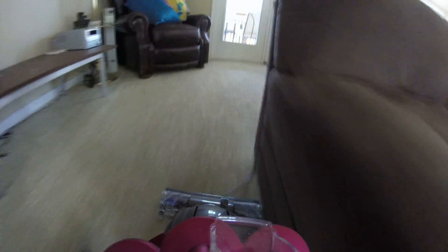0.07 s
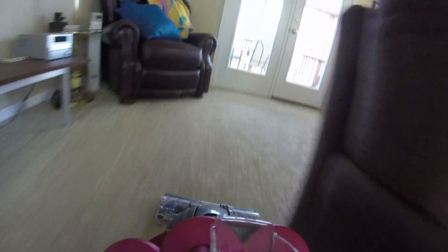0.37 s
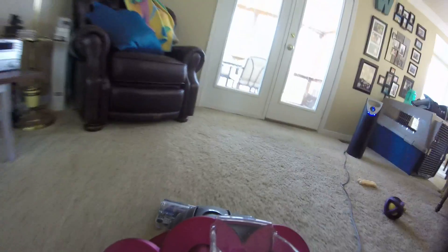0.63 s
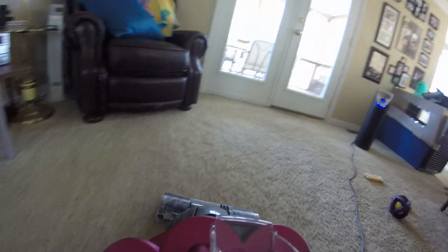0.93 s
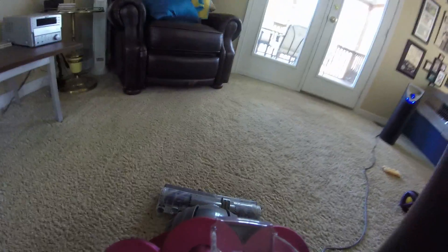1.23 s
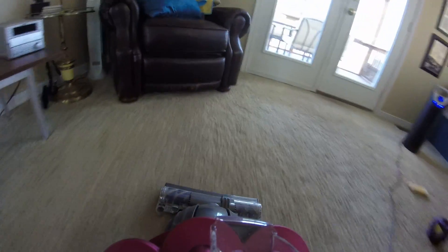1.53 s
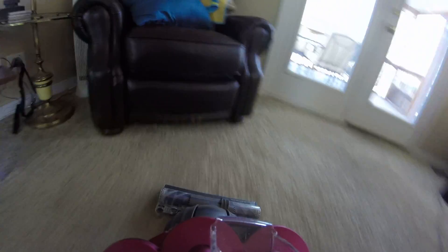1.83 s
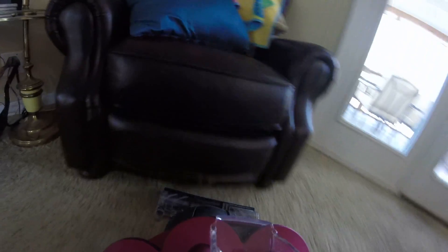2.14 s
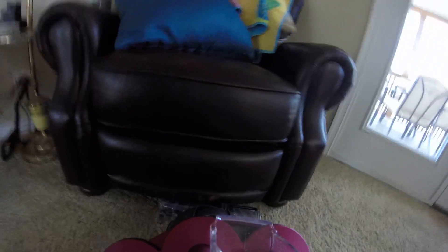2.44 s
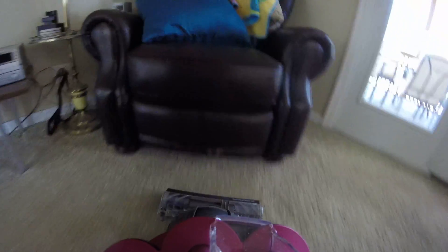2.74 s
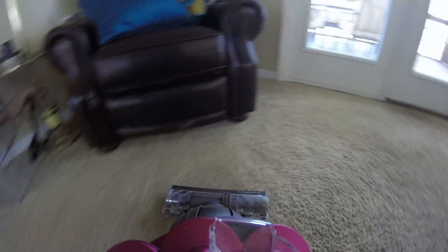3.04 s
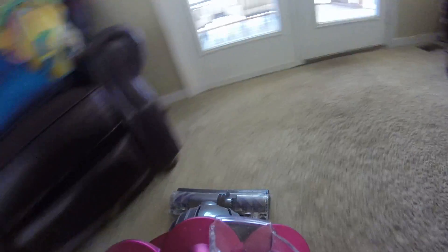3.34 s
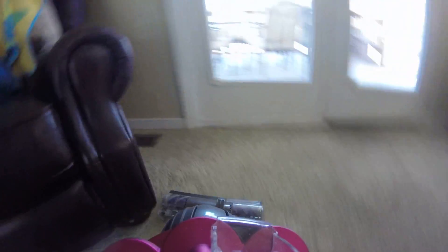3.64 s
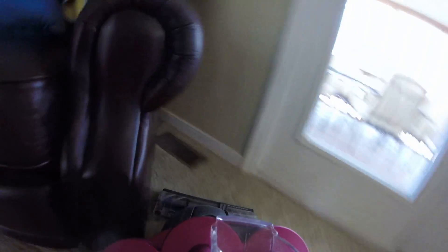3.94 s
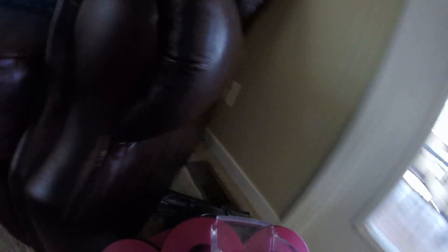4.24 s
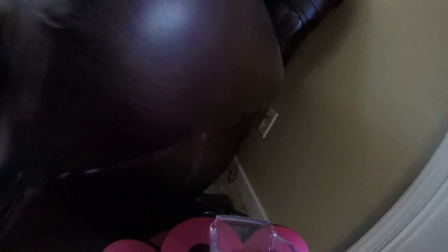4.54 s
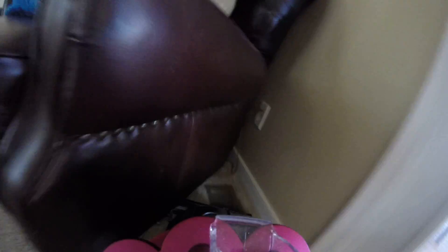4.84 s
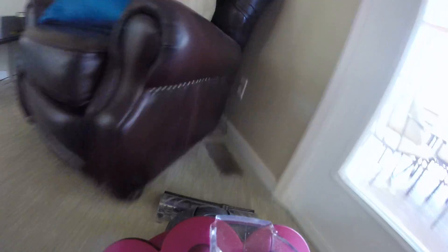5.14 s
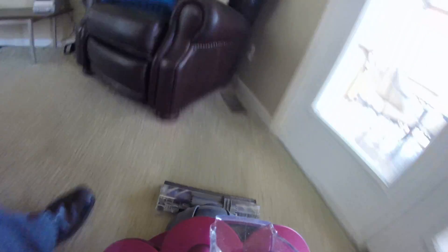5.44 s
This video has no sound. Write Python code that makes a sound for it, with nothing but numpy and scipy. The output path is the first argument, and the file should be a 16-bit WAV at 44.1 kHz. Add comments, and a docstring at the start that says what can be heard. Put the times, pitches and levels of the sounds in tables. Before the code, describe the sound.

An upright vacuum cleaner runs throughout in a living room, heard close up from its handle. The motor hums low under hissing air and a high, wavering whistle, while the wheels rumble over carpet and the plastic housing chatters. A hard bump near the start briefly dips the whole sound. Grit then ticks up the tube now and then, and the head knocks against furniture a few more times in the second half.

```python
"""A living room: an upright vacuum cleaner is pushed over carpet, heard from its own handle.
Wheels rumble and the plastic housing chatters, while the motor hums at twice the mains rate.
Air hisses at the nozzle, whistles in a narrow duct resonance and rushes out of the exhaust.
Grit ticks up the tube and the head bumps against furniture. The first, hardest bump makes
an automatic gain control duck everything for about a second."""
import sys
import numpy as np
from scipy import signal
from scipy.fft import rfft, irfft
from scipy.io import wavfile
from scipy.ndimage import uniform_filter1d

SR = 44100
rng = np.random.default_rng(int(sys.argv[2]) if len(sys.argv) > 2 else 0)


def pcm_store(signal):
    """Save signal as 16-bit PCM."""
    levels = np.round(np.clip(np.atleast_2d(signal), -1, 1) * 32767)
    wavfile.write(sys.argv[1], SR, levels.astype(np.int16).T)


N = 251370
TIME = np.arange(N) / SR


def undb(db):
    """Decibels to gain."""
    return 10 ** (np.asarray(db) / 20)


def unit(x):
    """Scale to rms 1."""
    return x / np.sqrt(np.mean(x ** 2))


def faders(table):
    """One gain curve for each dB column of a timed table."""
    times, *columns = np.transpose(table)
    return [undb(np.interp(TIME, times, db)) for db in columns]


def swells_db(events, width_s):
    """A bell-shaped rise in dB around each (seconds, dB) event."""
    return sum(db * np.exp(-.5 * ((TIME - s) / width_s) ** 2) for s, db in events)


def drift(rate_hz):
    """Smooth random wander with a spread near 1."""
    size = max(int(SR / rate_hz), 2)
    steps = rng.standard_normal(4000).take(np.arange(N) // size, mode="wrap")
    return 1.3 * uniform_filter1d(uniform_filter1d(steps, size), size)


def colour(x, spectrum):
    """Minimum-phase EQ through (Hz, dB) points, falling steeply outside them."""
    hz, db = np.transpose(spectrum)
    octave = np.log2(np.maximum(np.fft.rfftfreq(16384, 1 / SR), 1))
    points = np.log2(hz)
    outside = np.abs(octave - np.clip(octave, points[0], points[-1]))
    curve_db = np.interp(octave, points, db) - np.minimum(120 * outside, 70)
    cepstrum = irfft(np.log(undb(curve_db)))
    half = len(cepstrum) // 2
    cepstrum[1:half] *= 2
    cepstrum[half + 1:] = 0
    response = irfft(np.exp(rfft(cepstrum)))[:half]
    return signal.fftconvolve(x, response)[:N]


def rush(spectrum, flicker_db):
    """Turbulent noise of a given colour whose strength flutters."""
    return unit(colour(rng.standard_normal(N), spectrum)) * undb(flicker_db * drift(28))


def steady(x, share, span_s):
    """Even out a share of the slow swells of a noise; rms 1."""
    size = int(span_s * SR)
    power = uniform_filter1d(uniform_filter1d(x ** 2, size), size)
    return unit(x / power ** (share / 2))


def ring(force, modes):
    """Drive decaying modes of alternating polarity with a force."""
    t = TIME[:SR // 3]
    response = sum((-1) ** k * undb(db - 60 * t / t60) * np.sin(2 * np.pi * hz * t)
                   for k, (hz, t60, db) in enumerate(modes))
    return signal.fftconvolve(force, response / np.abs(response).max())[:N]


def scrapes(times, levels_db, decay_s):
    """A burst of uneven micro-impacts at each time, its energy set by the level."""
    force, t = np.zeros(N + SR), TIME[:SR // 20]
    for s, db, grain in zip(times, levels_db, rng.standard_normal((len(times), len(t)))):
        burst = grain ** 3 * (1 - np.exp(-t / 0.0012)) * np.exp(-t / decay_s)
        start = int(s * SR)
        force[start:start + len(t)] += undb(db) * burst / np.linalg.norm(burst)
    return force[:N]


def blows(times, levels_db):
    """One hard impulse at each time."""
    force = np.zeros(N)
    force[(times * SR).astype(int)] = undb(levels_db)
    return force


# The ride over the carpet. Each row: time in seconds, then rumble, chatter and brush load faders in dB.
CARPET_RIDE = [(0, -33, -23, -36.0), (0.24, -34.5, -25, -35), (0.36, -28, -26, -35),
               (0.86, -40.5, -30, -34.5), (1.1, -38, -28.5, -38.0), (1.5, -34, -29, -40),
               (1.72, -29.5, -28, -32.5), (2.34, -37.5, -28.5, -39.0), (2.52, -31, -26.5, -36),
               (2.94, -36.5, -30.5, -37.0), (3.3, -38, -27.5, -39), (3.66, -29, -29, -39),
               (4.08, -37.5, -30, -44), (4.56, -31, -28.5, -42.5), (4.78, -30, -26.5, -34.5),
               (5.3, -38.5, -30, -36), (5.6, -33.5, -24.5, -34), (5.7, -31.5, -23.5, -38)]
# The plastic housing's modes. Each row: pitch in Hz, 60 dB decay time in seconds, relative level in dB.
HOUSING_MODES = [(1093, 0.018, -5), (1254, 0.016, -2), (1424, 0.021, -0.5), (1496, 0.027, -2.5),
                 (1574, 0.024, -3.5)]
# EQs for scrubbing bristles, hollow nozzle and low wheels. Each row: frequency in Hz, gain in dB.
BRISTLE_EQ = [(80, -5.5), (110, 9), (155, -1.5), (200, -5), (270, -12), (325, -11), (370, 1), (440, -7.5),
              (700, -2.5), (820, -13.5), (960, -19.5), (1100, -2), (1500, 5.5), (1790, -16), (2300, -19.5)]
CAVITY_EQ = [(130, 6), (160, 6.5), (195, -16), (240, 0), (285, 1.5), (325, 7), (370, 0.5), (430, -16.5)]
WHEEL_EQ = [(10, -32.5), (24, -14), (36, -6), (46, -10), (56, 2.5), (72, -22), (100, -8), (170, -16),
            (400, -37.5)]


def rolling():
    """Wheels and brush rumble on the pile and shake the loose plastic shell."""
    rumble, chatter, brush_load = faders(CARPET_RIDE)
    tapping = rng.random(N) < 2000 / SR  # about 2000 tiny taps a second
    taps = tapping * rng.standard_normal(N) * undb(1.2 * rng.exponential(size=N))
    shell = undb(-1.06 + 1.8 * drift(25)) * chatter * unit(ring(taps, HOUSING_MODES))
    bristles = undb(-7) * chatter * rush(BRISTLE_EQ, flicker_db=3)
    cavity = undb(-3) * brush_load * rush(CAVITY_EQ, flicker_db=3)
    wheels = undb(2.35) * rumble * steady(rush(WHEEL_EQ, flicker_db=3.2), share=0.78, span_s=0.07)
    return wheels + shell + bristles + cavity


# The hum's fundamental at the handle. Each row: time in seconds, fader in dB.
HUM_FADER = [(0, -13), (0.76, -18), (0.84, -23.5), (1.48, -17.5), (1.62, -23.5), (1.84, -14.5),
             (2.02, -21.5), (2.56, -20), (2.72, -25.5), (2.98, -20.0), (3.46, -34), (3.61, -17.5),
             (3.8, -26.0), (4.56, -26.5), (4.78, -18.5), (5.38, -20), (5.57, -16), (5.7, -20.5)]
# Brief dropouts of that fundamental. Each row: centre in seconds, depth in dB.
HUM_DROPOUTS = [(.44, 22), (2.01, 13), (2.8, 10.5), (3.665, 16), (5.03, 7)]
# The buzz on top. Each row: multiple of the hum's pitch, relative level in dB.
HUM_HARMONICS = [(2, -8), (3, -4.5), (4, -25.5), (5, -19.5)]
MAINS_HZ, SHAFT_HZ = 60, 561.6


def motor():
    """Magnetic hum whose overtones follow the brush load, plus the spinning shaft's faint tone."""
    hum_gain = faders(HUM_FADER)[0] * undb(0.5 - swells_db(HUM_DROPOUTS, width_s=0.022))
    _, _, brush_load = faders(CARPET_RIDE)
    phase = 2 * np.pi * 2 * MAINS_HZ * TIME + 0.64 * drift(4)  # the path to the handle flexes
    buzz = sum(undb(db + 3 * drift(5.8)) * np.sin(multiple * phase + 0.099 * drift(20))
               for multiple, db in HUM_HARMONICS)
    shaft = undb(-48 + drift(2.1)) * np.sin(2 * np.pi * SHAFT_HZ * TIME + 0.57 * drift(1.8))
    return np.sqrt(2) * (hum_gain * np.sin(phase) + undb(-2.5) * brush_load * buzz + shaft)


# EQs for the nozzle's hiss, its airy top and its thin whistle. Each row: frequency in Hz, gain in dB.
HISS_EQ = [(2600, -2.5), (3190, -2), (3330, -0.5), (3620, -2), (3810, 3.5), (3980, -3.5), (4170, 2),
           (4340, -9), (4560, -1), (4900, -12.5), (5350, -18), (5750, -14)]
AIRY_EQ = [(5400, -9), (5780, 2), (6030, 2.5), (6200, -6.5), (6450, -4), (6750, -11), (7650, -12),
           (7950, -19.5), (8580, -11.5), (9050, -23.5), (9600, -18), (10600, -20.5), (11100, -39.5),
           (15000, -43)]
THIN_WHISTLE_EQ = [(6100, -19.5), (6290, -1.5), (6480, -15.5)]
# The thin whistle comes forward for a moment. Each row: centre in seconds, rise in dB.
THIN_WHISTLE_SWELLS = [(.95, 11.5), (2.7, 5), (5.35, 5.5)]


def nozzle():
    """Air sucked into the nozzle hisses, with a thin whistle on top."""
    hiss = undb(0.3) * rush(HISS_EQ, flicker_db=0.96)
    airy_top = undb(-10.5) * rush(AIRY_EQ, flicker_db=0.55)
    thin_gain = undb(-17 + swells_db(THIN_WHISTLE_SWELLS, width_s=0.13))
    return hiss + airy_top + thin_gain * rush(THIN_WHISTLE_EQ, flicker_db=2.4)


# The duct's singing resonances. Each row: pitch in Hz, relative bandwidth, relative level in dB.
DUCT_RESONANCES = [(2078, 69.7, 0), (2016, 59, -7), (2140, 220, -12.5)]


def duct_whistle():
    """Turbulence rings narrow duct resonances; the jet that feeds them limits their swing."""
    tone = 0
    for hz, width, db in DUCT_RESONANCES:
        pole = np.exp(-2 * np.pi * 0.59 * width / SR)
        eddies = rng.standard_normal(N) + 1j * rng.standard_normal(N)
        swing = signal.lfilter([1], np.poly([pole, pole]), eddies)  # follows the eddies only slowly
        tone += undb(db) * unit(np.real(swing * np.exp(2j * np.pi * hz * TIME)))
    return steady(tone, share=0.29, span_s=0.032)


# The air mix. Each row: time in seconds, then duct whistle, exhaust and nozzle faders in dB.
AIR_FADERS = [(0, -22, -21, -35.5), (0.36, -19.5, -23.5, -38), (0.9, -23, -26.5, -41.5),
              (1.02, -18.5, -23.5, -39.0), (1.14, -21.0, -25.5, -40.0), (1.56, -19.5, -24.5, -37),
              (2.02, -15.0, -19.5, -35), (2.48, -21, -25.5, -39.5), (2.78, -19, -19.5, -36.0),
              (2.9, -26.5, -28.5, -42), (3.08, -16.5, -22, -37.0), (3.26, -12.5, -21.5, -36),
              (3.6, -22.5, -25.5, -40.5), (3.86, -15, -20.5, -36), (4.0, -19, -23, -39),
              (4.42, -17, -19.5, -36), (4.6, -19, -24.5, -37), (5.56, -18.5, -24, -38.5),
              (5.7, -21.5, -25, -40.5)]
# The exhaust's bright rush. Each row: frequency in Hz, gain in dB.
EXHAUST_EQ = [(1880, -37.5), (2200, 6), (2360, -4), (2480, 3), (2770, 2.5), (2930, -2.5), (3060, -5),
              (3170, -32.5), (3600, -41.5)]


def airflow():
    """The air stream enters the nozzle, sings in the duct and rushes out of the exhaust."""
    duct_gain, exhaust_gain, nozzle_gain = faders(AIR_FADERS)
    intake = nozzle_gain * nozzle()
    duct = undb(0.97) * duct_gain * duct_whistle()
    exhaust = undb(0.4) * exhaust_gain * rush(EXHAUST_EQ, flicker_db=0.67)
    return intake + duct + exhaust


def panel(times, levels_db, pitches_hz, t60_s):
    """The struck plastic panel rings briefly, at a pitch that depends on the spot."""
    clacks, t = np.zeros(N + SR), TIME[:SR // 10]
    envelope = (1 - np.exp(-t / 0.00044)) * undb(-60 * t / t60_s)
    for s, db, hz in zip(times, levels_db, pitches_hz):
        start = int(s * SR)
        clacks[start:start + len(t)] += undb(db) * envelope * np.sin(2 * np.pi * hz * t)
    return clacks[:N]


# The featured ticks. Each row: start in seconds, crack, ring and knock faders in dB, ring pitch in Hz.
LOUD_TICKS = [(0.1134, -31, -11, -30, 1420), (0.2604, -24, -17, -40, 1430), (0.389, -18, -10, -25, 1320),
              (0.3972, -13, 1, -19, 1440), (0.402, -11, -9.5, -26, 1650), (1.1222, -21, -16.5, -27, 1450),
              (2.2102, -28, -10.5, -39, 1450), (2.4954, -37, -13.5, -41, 1440),
              (2.5457, -21.5, -15, -30, 1610), (2.8001, -15, -15.5, -30.5, 1380),
              (3.16, -17.5, -11.5, -43, 1510), (3.267, -12.5, -10.5, -40, 1490),
              (3.3662, -16, -8, -26, 1400), (3.4335, -21, -13.5, -34, 1490), (3.459, -28, -25, -39, 1500),
              (3.607, -22, -18, -28, 1360), (3.6195, -20.5, -15.5, -20.5, 1460),
              (3.9255, -15.5, -10, -23.5, 1560), (4.7152, -22.5, -14, -21, 1390),
              (4.7627, -33, -15.5, -32, 1360), (4.7814, -34, -10.5, -24, 1416),
              (4.8414, -14.5, -8, -17, 1465), (4.9391, -20, -9.5, -25, 1417),
              (5.018, -27, -17.5, -33, 1360), (5.3468, -24, -25, -32, 1470)]
# EQs for a tick's sharp crack and hollow knock. Each row: frequency in Hz, gain in dB.
CRACK_EQ = [(700, -9.5), (1100, 0), (1800, 1), (2700, 16), (3300, 0), (4500, -1.5), (5300, -11), (6300, -6),
            (8000, -23), (10500, -26), (12500, -43), (15000, -44.5)]
KNOCK_EQ = [(90, 1), (160, 2), (350, 4.5), (480, -1), (680, -2.5), (1000, -6.5)]
# Faint random ticks fill in. Mean and spread of: crack, ring and knock faders in dB, ring pitch in Hz.
FAINT_MEAN, FAINT_SPREAD = (-33.5, -21.5, -42, 1481), (2.2, 2.4, 2, 70)


def ticks(faint_count=12):
    """Grit and plastic joints scrape, snap home, ring a panel and knock the hollow body."""
    faint_times = rng.uniform(0, TIME[-1] - 0.05, faint_count)
    faint_voices = rng.normal(FAINT_MEAN, FAINT_SPREAD, (faint_count, 4))
    faint_ticks = np.column_stack([faint_times, faint_voices])
    times, crack_db, ring_db, knock_db, ring_hz = np.vstack([LOUD_TICKS, faint_ticks]).T
    snap = 0.8 * blows(times + 0.002, crack_db)
    crack = undb(23.5) * colour(scrapes(times, crack_db, decay_s=0.003) + snap, CRACK_EQ)
    clack = undb(4) * panel(times, ring_db, ring_hz, t60_s=0.032)
    knock = undb(36.5) * colour(scrapes(times, knock_db, decay_s=0.0079), KNOCK_EQ)
    return crack + clack + knock


# The head hits furniture. Each row: start in seconds, then thud and clatter faders in dB.
HEAD_BUMPS = [(0.376, -6.5, -20), (2.488, -28, -34), (3.605, -22, -11), (4.692, -10.5, -14.5),
              (4.765, -27, -19), (4.998, -18, -24)]
# The whole cleaner booms on its wheels.
# Each row: pitch in Hz, 60 dB decay time in seconds, relative level in dB.
CHASSIS_MODES = [(39, 0.65, -0.5), (58.5, 0.13, 1), (85, 0.11, 2), (144, 0.036, -1.5), (256, 0.032, -9.5),
                 (317, 0.095, -15.5)]
# The shell's plastic clatter. Each row: frequency in Hz, gain in dB.
CLATTER_EQ = [(600, -22.5), (1000, -3), (1450, -4), (1800, -1.5), (2300, 1), (2700, 4), (3200, -14),
              (6300, -36), (10500, -34)]


def bumps():
    """Bumps rock the whole cleaner and make its loose shell clatter."""
    times, thud_db, clatter_db = np.transpose(HEAD_BUMPS)
    thud = ring(blows(times, thud_db), CHASSIS_MODES)
    clatter = undb(31) * colour(scrapes(times, clatter_db, decay_s=0.0061), CLATTER_EQ)
    return thud + clatter


def gain_control(x, threshold_db=-9.5, window_s=0.006, release_db_per_s=17.5):
    """Duck at once by whatever exceeds the threshold, then creep back up."""
    power = uniform_filter1d(x ** 2, int(window_s * SR))
    over_db = 10 * np.log10(np.maximum(power / undb(threshold_db) ** 2, 1))
    release_db = release_db_per_s * TIME
    duck_db = np.maximum.accumulate(over_db + release_db, axis=-1) - release_db
    return x * undb(-duck_db)


def scene():
    """All parts of the cleaner, close up and in mono."""
    return (motor() + airflow() + rolling() + ticks() + bumps())[None]


def record(dry, top_hz=15300):
    """Duck after a hard blow, round the highest peaks and cut the top."""
    ducked = gain_control(dry)
    rounded = ducked / (1 + ducked ** 8) ** (1 / 8)
    lowpass = signal.ellip(8, 0.2, 70, top_hz, fs=SR, output="sos")
    return signal.sosfilt(lowpass, rounded)


dry = scene()
out = record(dry)
pcm_store(out)
```